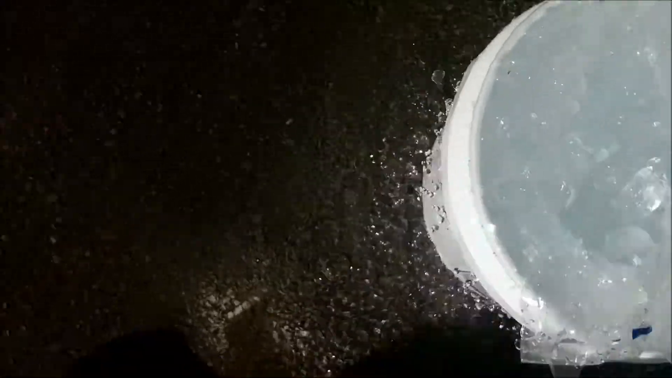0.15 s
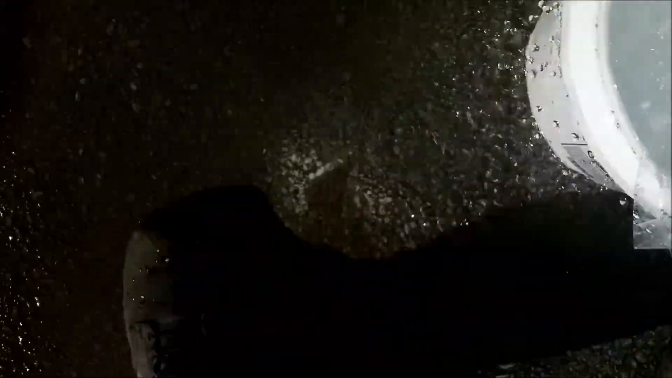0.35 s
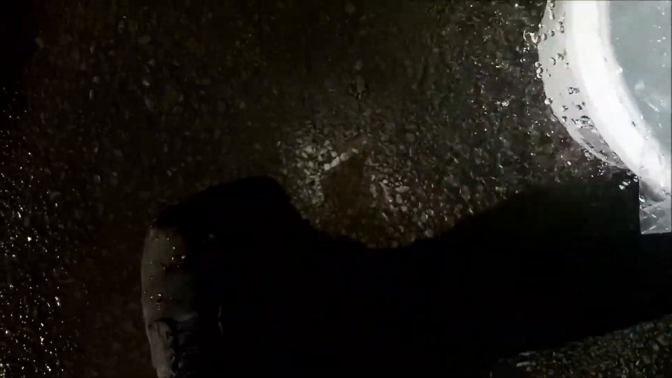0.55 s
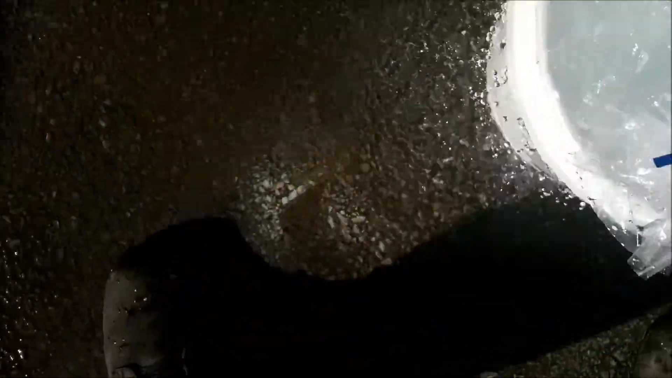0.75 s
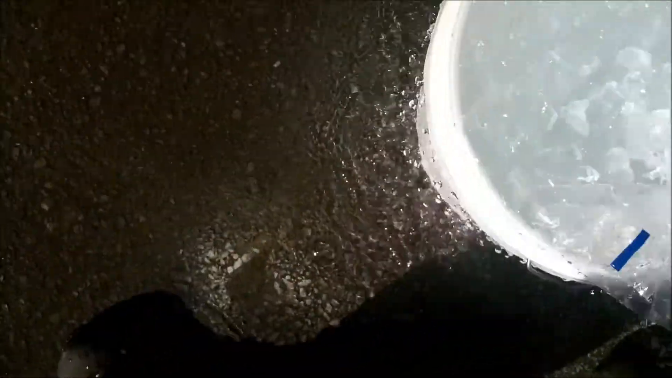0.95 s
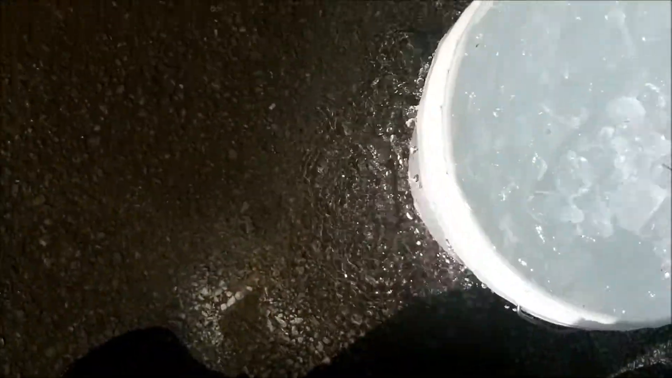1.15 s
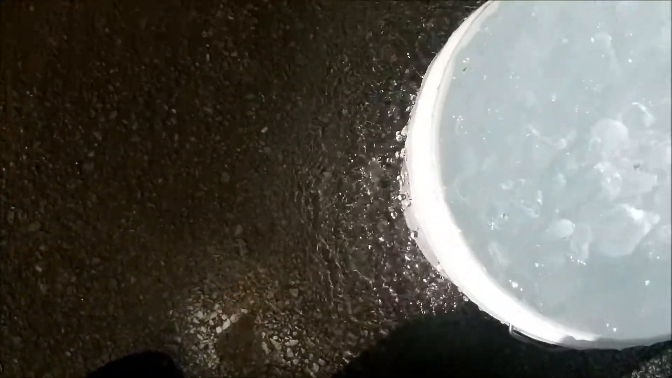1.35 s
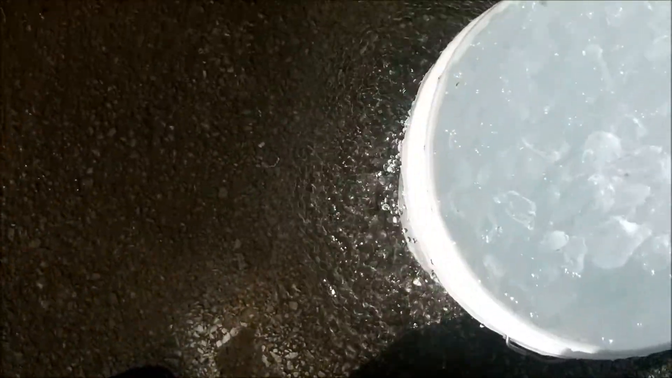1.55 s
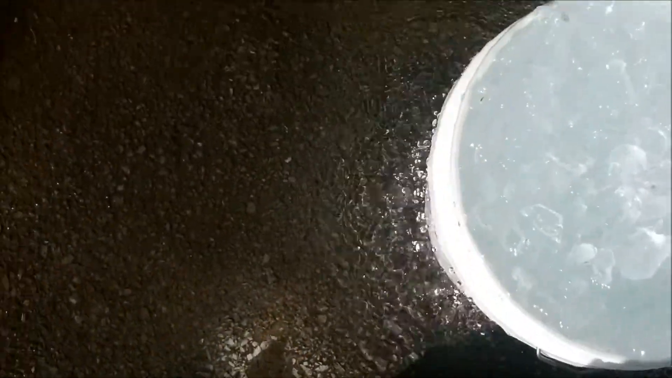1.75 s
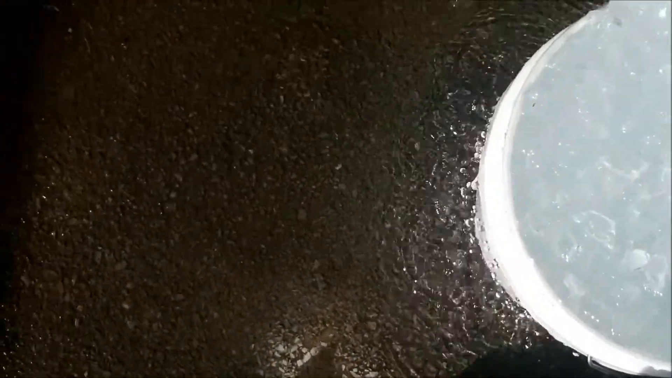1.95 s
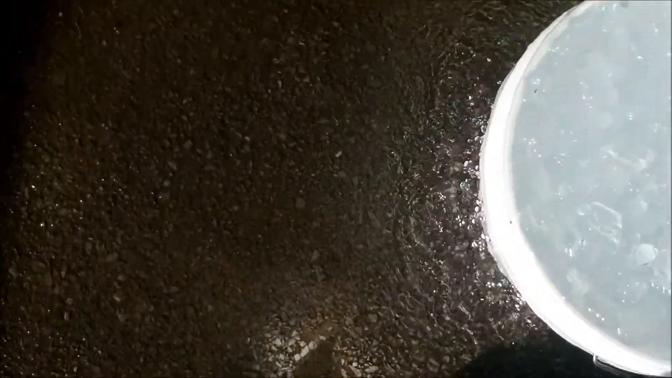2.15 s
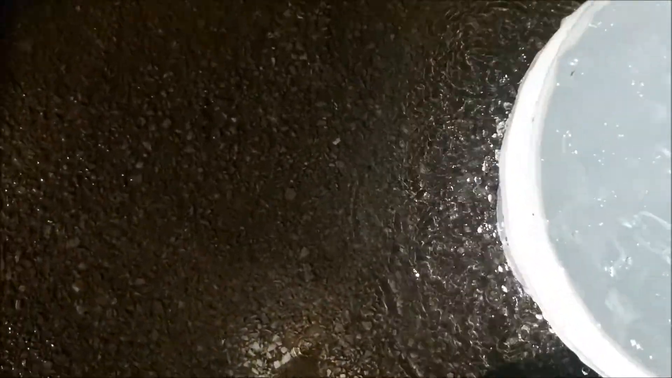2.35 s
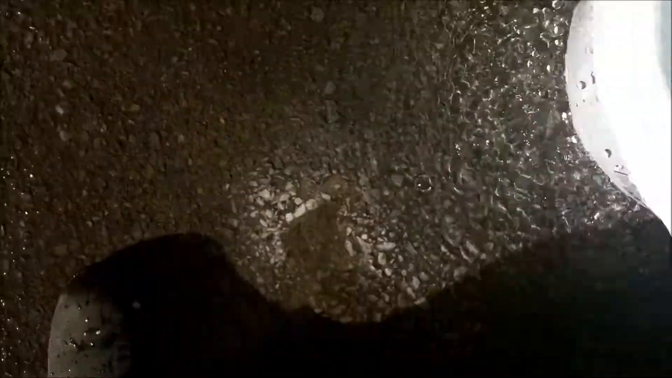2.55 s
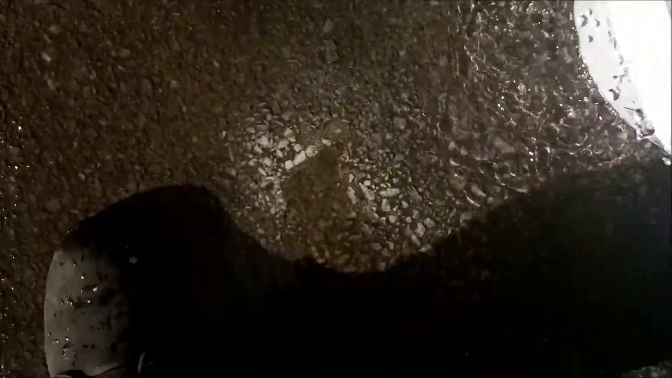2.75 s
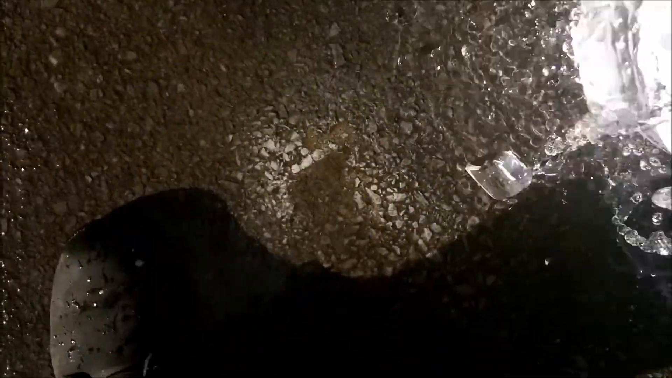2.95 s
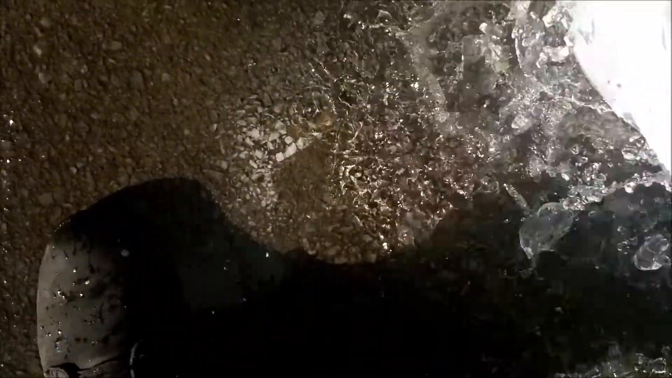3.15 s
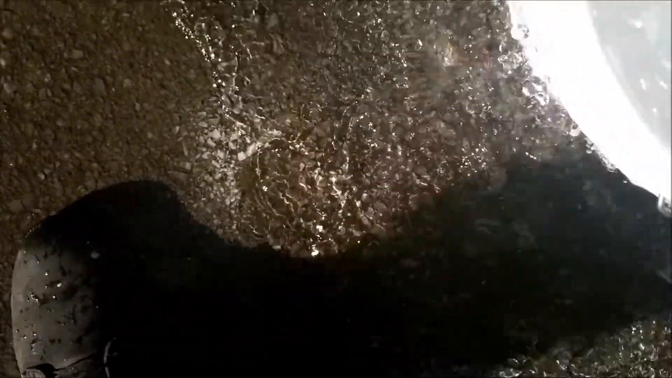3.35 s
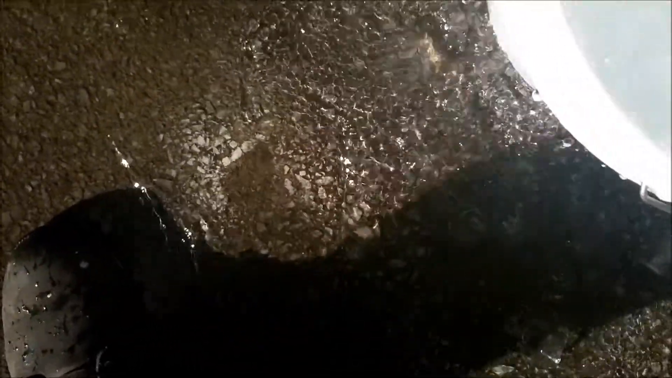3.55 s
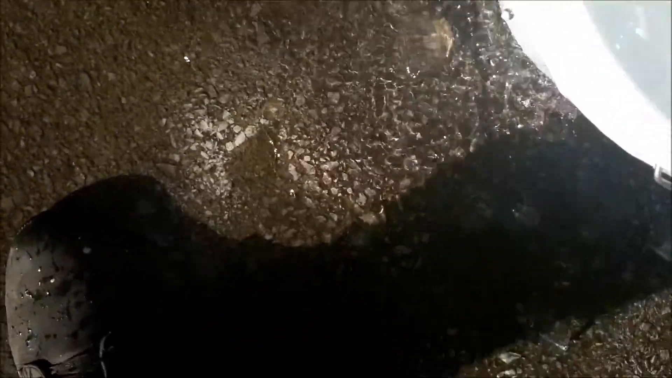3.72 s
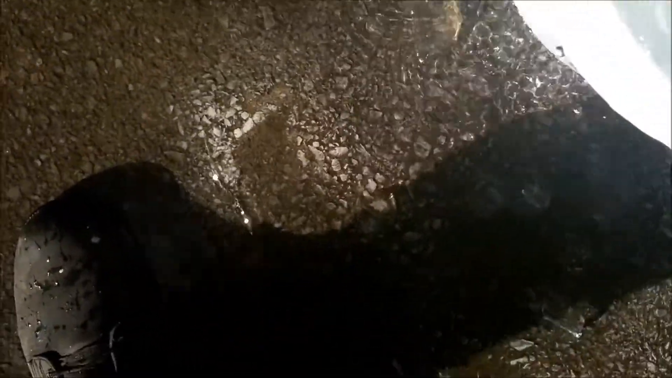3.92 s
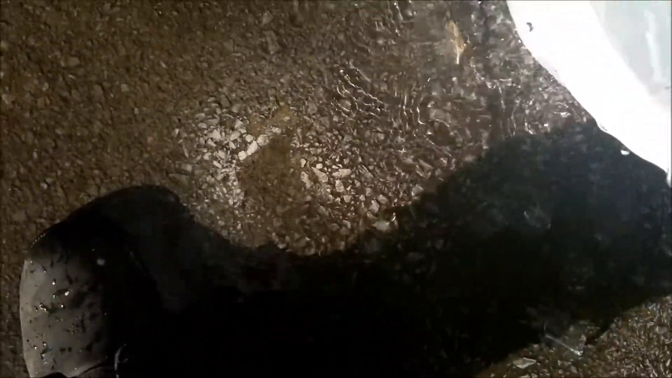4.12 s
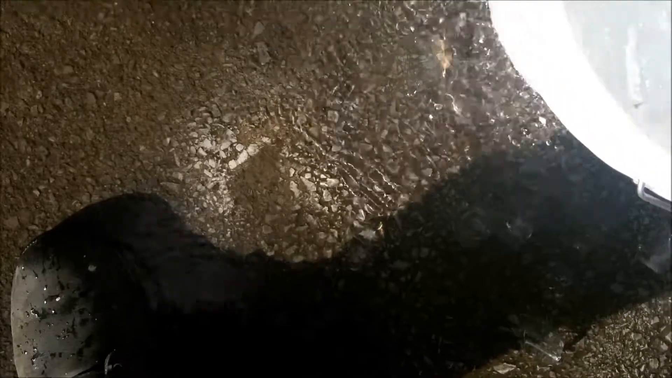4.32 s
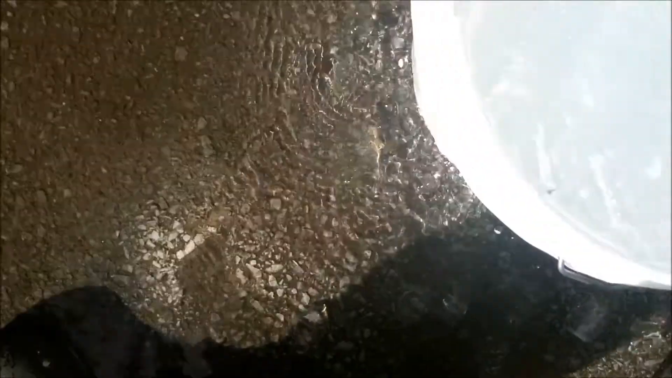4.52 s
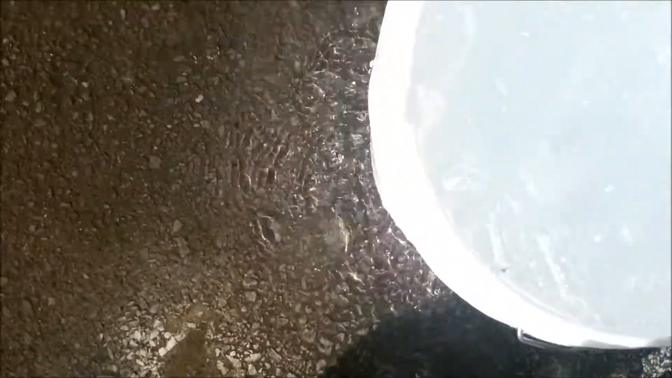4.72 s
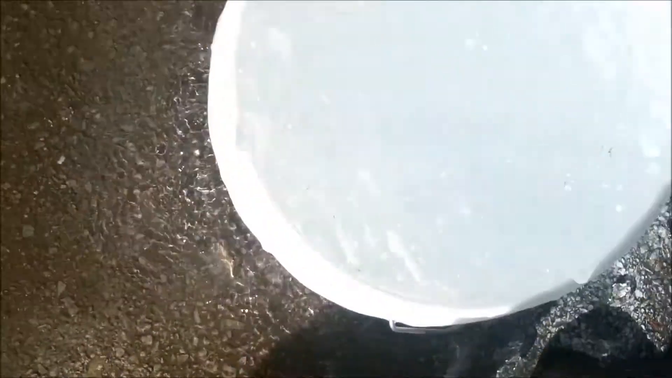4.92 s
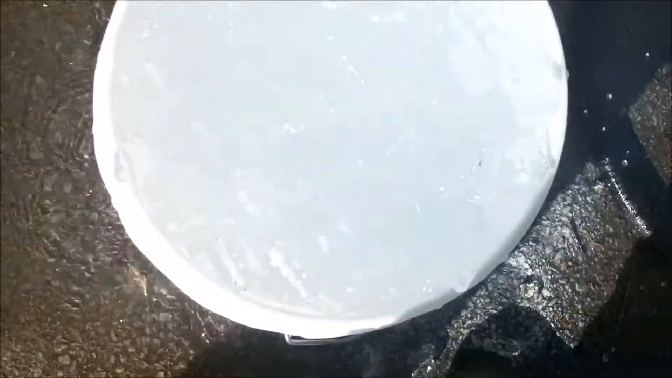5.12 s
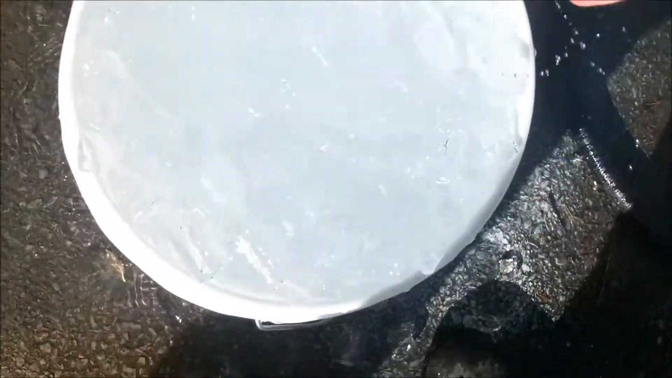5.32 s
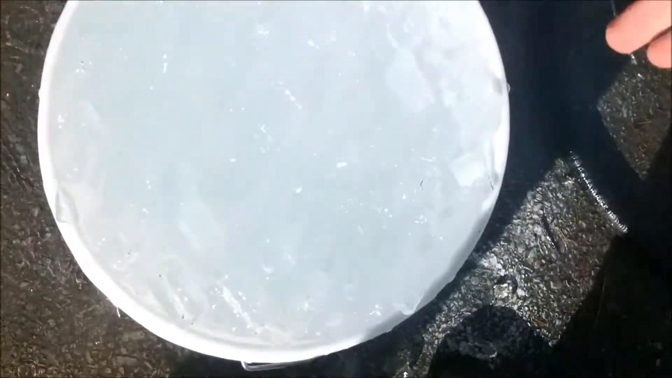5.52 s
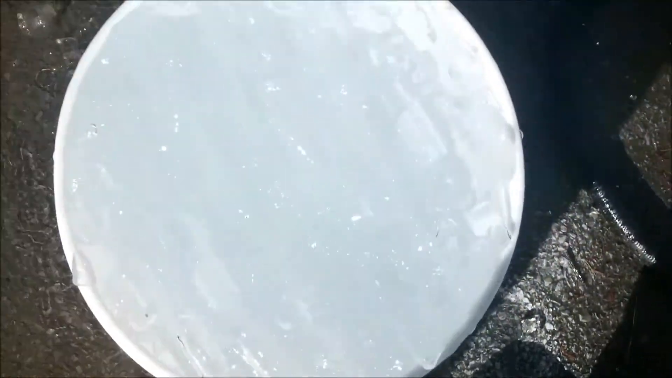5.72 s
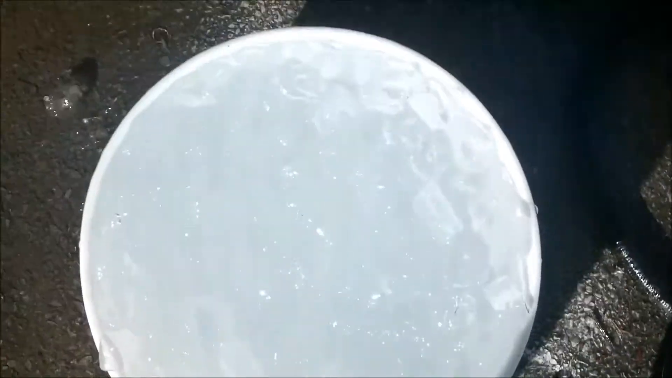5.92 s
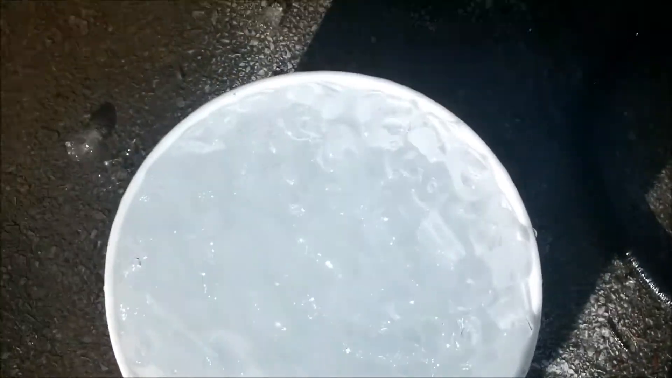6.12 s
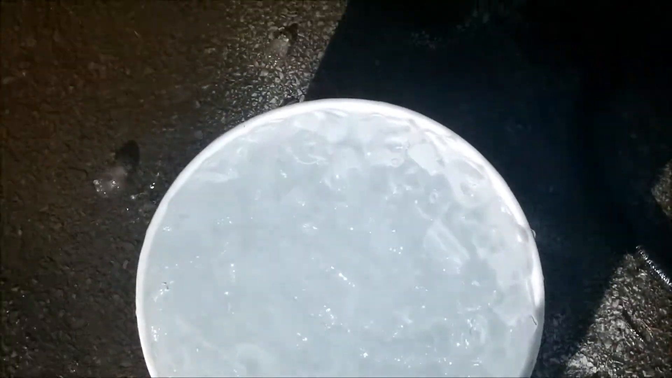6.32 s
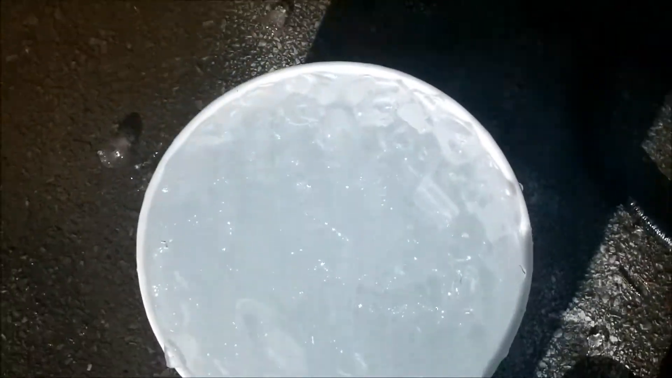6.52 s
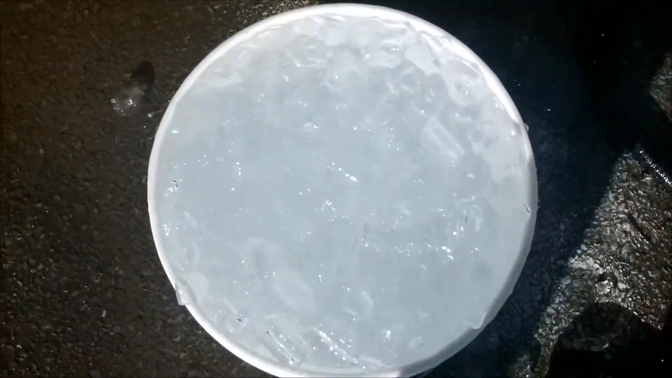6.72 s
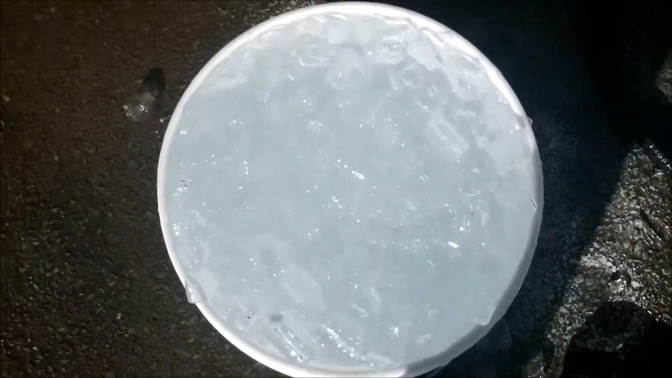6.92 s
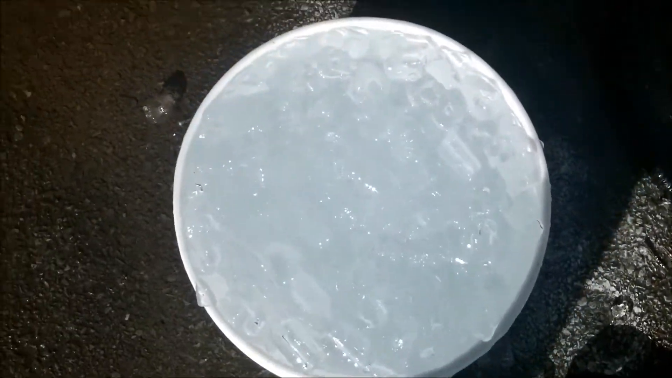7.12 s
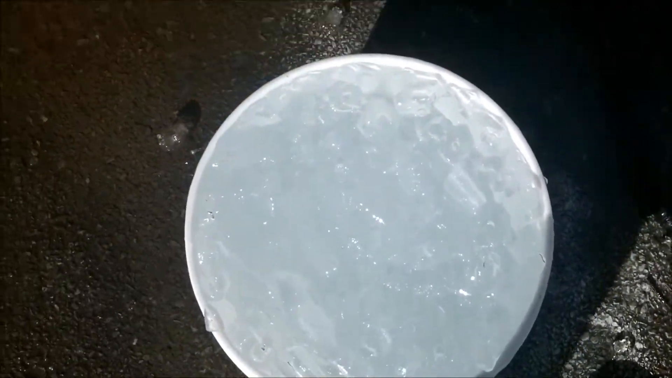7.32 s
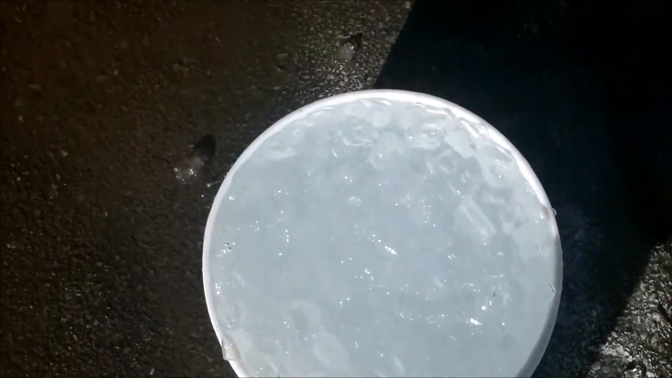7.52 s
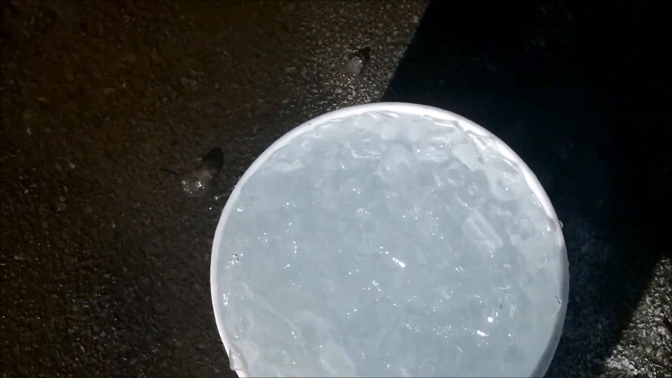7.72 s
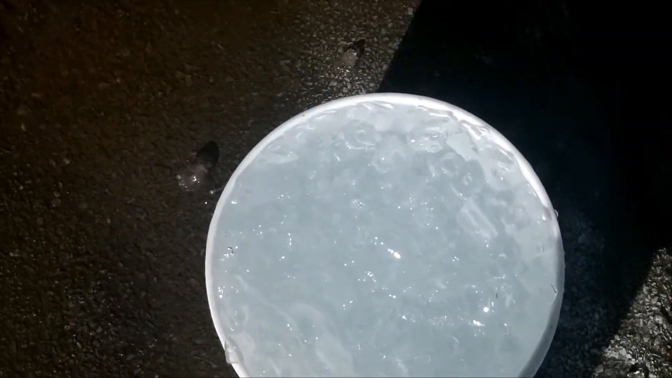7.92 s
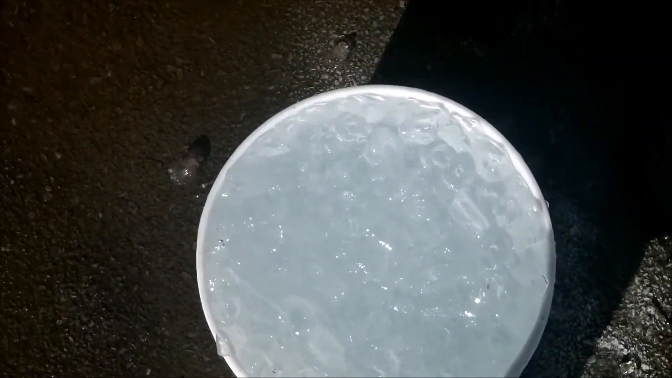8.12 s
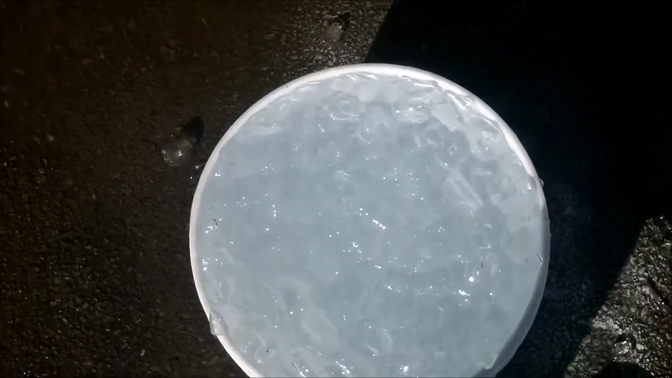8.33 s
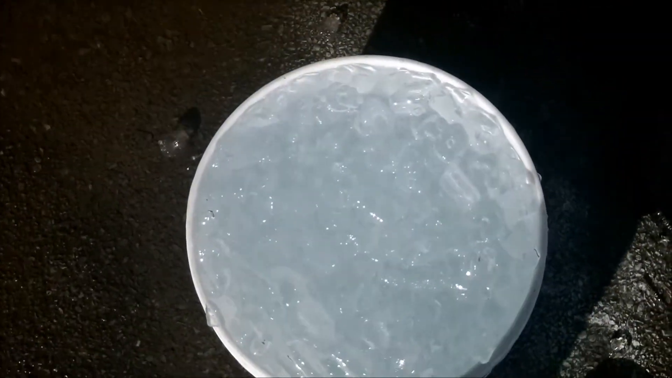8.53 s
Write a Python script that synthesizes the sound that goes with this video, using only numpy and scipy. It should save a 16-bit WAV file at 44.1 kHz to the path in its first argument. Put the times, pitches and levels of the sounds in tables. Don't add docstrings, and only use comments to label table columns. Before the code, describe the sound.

Close by, outdoors, the pour is already under way at 0 s: a dense bright rush of tiny ringing bubbles, pulsing several times a second, with ice knocks, dry ticks and plastic bag snaps. Around 1.7 s it thins to separate plops and drops. At 2.7 s water slaps wet gravel and a loud splashing flood begins, full of hard clacks and rising bubble plops, strongest around 3.1 to 3.7 s. After a short dip near 3.9 s, a second flood surges from 4 to 4.7 s, with short upward bloops, then dies by 5.1 s. What remains is quiet open air, soft low wind with a gust near 6.9 s, and a distant motor's faint wavering hum and whine. Sparse drips come between 5.7 and 6.1 s; drips and tiny crinkles cluster from 6.9 to 7.4 s. A very faint, falling wet sole creak follows at 7.5 s, then calm air until 8.5 s.

```python
import sys
import numpy as np
from scipy import signal
from scipy.io import wavfile
from scipy.ndimage import uniform_filter1d

SR = 44100
rng = np.random.default_rng(int(sys.argv[2]) if len(sys.argv) > 2 else 0)


def undo_db(level):
    steps = np.asarray(level, float) / 20
    return 10 ** steps


def generate_wav(signal):
    frames = np.transpose(np.atleast_2d(signal))
    scaled = np.clip(frames, -1, 1) * 32767
    pcm = np.round(scaled).astype(np.int16)
    wavfile.write(sys.argv[1], SR, pcm)


N = 377937

# (f/Hz, density/dB per Hz)
RUSH_COLOUR = [(210, -23), (350, -33), (512, -16.5), (774, -7.5), (2500, 3.5), (3700, -7.5), (5440, -18),
               (6280, -24.5), (7590, -35.5), (11300, -33.5), (15500, -62)]


def evened(x):
    return x / np.sqrt(np.mean(x ** 2) + 1e-20)


def smoothed(x, size):
    return uniform_filter1d(uniform_filter1d(x, size), size)


def curve(rows):
    s, *columns = np.transpose(rows)
    return [np.interp(np.arange(N) / SR, s, c) for c in columns]


def colour(x, points):
    f, db = np.transpose(points)
    hz = np.abs(np.fft.fftfreq(8192, 1 / SR))
    log_gain = np.log(undo_db(np.interp(np.log(hz + 1), np.log(f + 1), db)))
    spectrum = np.exp(log_gain - 1j * signal.hilbert(log_gain).imag)
    taps = np.fft.ifft(spectrum).real[:4096]
    return signal.oaconvolve(x, taps)[:len(x)]


def band(x, lo_hz, hi_hz):
    edges_hz = [lo_hz, min(hi_hz, .45 * SR)]
    return signal.sosfilt(signal.butter(2, edges_hz, "bandpass", fs=SR, output="sos"), x)


def resonate(x, hz, width_hz):
    r = np.exp(-np.pi * width_hz / SR)
    return signal.lfilter([1 - r], [1, -2 * r * np.cos(2 * np.pi * hz / SR), r * r], x)


def add(mix, s, sound):
    part = mix[round(s * SR):][:len(sound)]
    part += sound[:len(part)]


def surges(rows):
    roundness = 1.23
    t = np.arange(0, N / SR + .01, .002)
    s, db, rise, fall = np.transpose(rows)[:, :, None]
    away = np.where(t < s, (s - t) / rise, (t - s) / fall)
    power = undo_db(2 * (db - 10 * away ** roundness)).sum(0)
    return np.interp(np.arange(N) / SR, t, 10 * np.log10(power + 1e-12))


def bubble(hz, t60, rise, start=0.00035):
    t = np.arange(round(t60 * SR) + 8) / SR
    shape = undo_db(-60 * t / t60) * (1 - np.exp(-(t / start) ** 2))
    return np.sin(2 * np.pi * hz * (t + rise * t ** 2 / (2 * t60))) * shape / shape.max()


def grains(lo_hz, hi_hz, per_s, cycles, spread_db, bunch, count=14):
    out = np.zeros(N)
    for hz in np.geomspace(lo_hz, hi_hz, count):
        chance, size, stretch = rng.random(N), rng.exponential(1, N), rng.uniform(0.21, 7.32)
        hits = undo_db(spread_db * np.minimum(size, 4)) * (chance < per_s * bunch / count / SR)
        grain = bubble(hz, stretch * cycles / hz, 1.0)
        out += signal.oaconvolve(hits, grain / np.linalg.norm(grain) * np.sqrt(hz))[:N]
    return out


def air():
    # (f/Hz, density/dB per Hz)
    air_colour = [(29, -35), (50, -36), (85, -3), (197, -5), (352, -2.5), (674, -6), (837, -2.5),
                  (1260, -5), (1530, -2.5), (5750, -16.5), (8050, -28.5), (9760, -22), (14700, -20.5),
                  (15800, -36)]
    # (t/s, level/dB)
    air_swell = [
        (0, 5),
        (2.3, 4),
        (2.7, 9),
        (3.1, 3),
        (6.4, 3),
        (7.6, 2.5),
        (8.4, 4.5),
    ]
    frames, hz = N // 512 + 5, np.fft.rfftfreq(2048, 1 / SR)
    a, b, patches = rng.standard_normal((frames, 1025, 3)).T
    patches = evened(uniform_filter1d(uniform_filter1d(patches, 20, 0), 8, 1))
    f, db = np.transpose(air_colour)
    swell_db = np.interp(np.arange(frames) * 512 / SR, *np.transpose(air_swell))
    colour_db = np.interp(np.log(hz + 1), np.log(f + 1), db)[:, None]
    field_db = colour_db + (1.62 * patches + swell_db) / (1 + (hz[:, None] / 4500) ** 4)
    noise = signal.istft((a + 1j * b) * undo_db(field_db), nperseg=2048, noverlap=1536)[1][:N]
    return undo_db(-37.5 - 1.31) * evened(noise)


def machine():
    # (t/s, level/dB)
    hum_level = [(0, -63.5), (4.15, -54), (4.96, -62), (5.16, -49.5), (6.35, -55.5), (6.78, -44),
                 (7.35, -47.5), (7.59, -63), (7.99, -44.5), (8.14, -50), (8.26, -69), (8.45, -55)]
    # (f/Hz, level/dB)
    whines = [(346, -52), (463.0, -57), (1502, -52), (1906, -66), (3770, -61)]
    hum_hz = 76
    wander = evened(uniform_filter1d(rng.standard_normal(N), 15000))
    hum = np.sqrt(2) * np.sin(2 * np.pi * np.cumsum(hum_hz + 0.68 * wander) / SR)
    out = undo_db(curve(hum_level)[0]) * hum
    gain_db = .5 * (np.arange(N) / SR - 5.0)
    for hz, db in whines:
        tone = np.sqrt(2) * np.sin(2 * np.pi * np.cumsum(hz * (1 + .006 * wander)) / SR)
        fuzz = evened(resonate(rng.standard_normal(N), hz, .02 * hz))
        out += undo_db(db + gain_db) * (.7 * tone + .45 * fuzz)
    return out


def wind():
    # (t/s at peak, level/dB, rise/s, fall/s)
    gusts = [
        (2.75, -48.5, 0.35, 0.37),
        (6.85, -44, 0.15, 0.65),
    ]
    breeze_db = -55
    level = np.sqrt(undo_db(2 * surges(gusts)) + undo_db(2 * breeze_db))
    return undo_db(2.5) * level * evened(band(rng.standard_normal(N), 7.6, 68))


def rush():
    # (t/s at peak, level/dB, rise/s, fall/s)
    pour = [(.018, -24.5, 0.037, 0.094), (.144, -18.5, 0.071, 0.072), (.24, -26, 0.047, 0.049),
            (.342, -17, 0.12, 0.094), (.5, -22, 0.15, 0.089), (.636, -20.5, 0.023, 0.069),
            (.718, -18.5, 0.031, 0.073), (.8, -20, 0.069, 0.061), (.865, -38, .02, 0.027),
            (.994, -16.5, 0.17, 0.058), (1.05, -26, 0.022, .09), (1.168, -18, 0.054, 0.021),
            (1.2, -21.5, .03, 0.06), (1.305, -17, 0.04, 0.059), (1.425, -21, 0.031, 0.036),
            (1.46, -24.5, 0.04, 0.13), (1.54, -22.5, 0.026, 0.034), (1.639, -23, 0.033, 0.12),
            (1.935, -26.5, 0.014, 0.026), (2.145, -30.5, 0.17, 0.16), (2.271, -26, 0.02, 0.017),
            (2.346, -30.5, 0.032, 0.0084), (2.505, -27.5, 0.12, 0.049), (2.614, -21, 0.038, 0.043),
            (2.709, -17, 0.039, 0.049), (2.825, -16, 0.012, 0.94), (3.13, -25.5, 0.45, 0.19),
            (3.332, -17.5, 0.045, 0.11), (3.463, -17, 0.017, 0.11), (3.56, -22, .05, 0.035),
            (3.66, -18.5, 0.076, 0.13), (3.73, -21.5, 0.076, 0.24), (3.99, -16, 0.034, 0.073),
            (4.04, -15.5, 0.051, 0.052), (4.135, -16.5, 0.038, 0.042), (4.175, -25, 0.023, 0.028),
            (4.27, -16, 0.19, 0.13), (4.44, -23, 0.052, 0.011), (4.51, -15, 0.11, 0.072),
            (4.59, -20, 0.055, 0.082), (4.686, -18, 0.073, 0.048), (4.76, -25.5, .03, 0.087),
            (4.85, -29, 0.14, 0.13), (5.097, -35, 0.19, 0.043)]
    # (t/s, share)
    flooding = [
        (0, -0.14),
        (1.5, -0.68),
        (2.75, -0.14),
        (2.87, 1.02),
        (3.4, 0.36),
        (3.9, -0.46),
        (4.0, 0.73),
        (4.6, 0.95),
        (5.3, 0.2),
    ]
    usual_db = -24
    level_db, spill = surges(pour), curve(flooding)[0]
    lull_db = np.minimum(usual_db - level_db, 25)
    spray_db = -6.5 - 6.5 * spill
    gurgle_db = -12.5 - 3 * spill + 0.054 * lull_db
    wall_db = -25.5 + 21.5 * spill

    lumps = evened(smoothed(rng.standard_normal(N), 200))
    shakes = evened(smoothed(rng.standard_normal(N), 1100))
    even = 1 - 0.4 * np.clip(spill, 0, 1) ** 2
    thin = undo_db(-.6 * np.maximum(lull_db + 4, 0))
    bunch = thin * undo_db((2.2 * lumps + 1.0 * shakes) * even)

    gurgle = evened(colour(grains(432, 891, 1200, 5.27, 4.9, bunch), RUSH_COLOUR))
    splash = evened(colour(grains(1100, 4100, 3000, 8.5, 3.2 * even, bunch), RUSH_COLOUR))
    spray = evened(colour(grains(3530, 6380, 2500, 4.2, 3.3, bunch), RUSH_COLOUR))
    sizes = undo_db(4.0 * even * np.minimum(rng.exponential(1, N), 4))
    crackle = sizes * (rng.random(N) < 450 * bunch / SR)
    crackle = colour(crackle * rng.choice([-1, 1], N), RUSH_COLOUR)
    low, high = evened(band(crackle, 1350, 4870)), evened(band(crackle, 4230, 17000))
    wall = evened(resonate(splash + 0.11 * low, 2230, 330))

    mix = splash + 0.54 * low
    mix += undo_db(spray_db) * (1.0 * spray + 0.51 * high)
    mix += undo_db(gurgle_db) * gurgle + undo_db(wall_db) * wall
    return undo_db(level_db - 5.5) * mix / np.sqrt(thin)


def plops():
    # (t/s, peak level/dB, f/Hz, t60/s)
    strong_plops = [(0.1016, -10, 2040, 0.029), (0.131, -6.5, 2660, 0.026), (0.3035, 1, 2440, 0.0034),
                    (0.3834, -5, 2700, 0.0046), (0.462, 0, 2580, 0.0021), (0.4792, -11, 2260, 0.015),
                    (0.534, -15, 2410, 0.0054), (0.5406, -7, 2740, 0.0048), (0.5537, -11.5, 1970, 0.029),
                    (0.5606, -17, 2060, 0.0055), (0.6398, -9, 2470, 0.011), (0.6728, -21, 2470, 0.012),
                    (0.7197, 1, 1710, 0.0061), (0.7787, -0.5, 2510, 0.0076), (0.9473, -6, 2500, 0.0094),
                    (1.0904, -20, 2000, 0.0059), (1.1519, 1.5, 3200, 0.0027), (1.2025, -6, 2570, 0.0038),
                    (1.4482, -0.5, 2400, 0.0046), (1.4564, -3, 2900, 0.0072), (1.522, -4, 2720, 0.0069),
                    (1.5413, -10, 2140, 0.019), (1.5749, -14, 3030, 0.0064), (1.621, -8, 3230, 0.011),
                    (1.6357, -0.5, 2680, 0.0077), (1.7138, -10, 2570, 0.01), (1.7713, -9, 3240, 0.0061),
                    (1.925, -11.5, 1470, 0.021), (1.9332, -4.5, 2350, 0.012), (1.938, -2, 1550, 0.018),
                (1.9626, -15, 2320, 0.0087), (2.0392, -16.5, 2790, 0.049), (2.131, -12, 2320, 0.014),
                (2.1383, 0, 3030, 0.0059), (2.434, -9, 1610, 0.0053), (2.5394, -8.5, 1710, 0.033),
                (2.8016, 1, 3120, 0.0026), (2.8305, -4.5, 2050, 0.016), (3.0828, -2, 2430, 0.011),
                (3.1264, -2, 2310, 0.017), (3.1398, -2, 1750, 0.006), (3.1701, 3, 2150, 0.017),
                (3.225, 2, 2230, 0.017), (3.2583, 0, 2124, 0.026), (3.301, -6, 1730, 0.027),
                (3.3453, -4.5, 1680, 0.017), (3.4184, 2, 2170, 0.015), (3.461, -1, 1510, 0.0047),
                (3.4993, -11, 2400, 0.007), (3.532, -3.5, 2200, 0.015), (3.698, -7, 3100, 0.038),
                (3.7188, -3, 2210, 0.0031), (3.9919, -3, 2150, 0.014), (4.402, -14, 2240, 0.017),
                (4.4624, -13, 2140, 0.013), (4.4682, -8, 1730, 0.029), (5.089, -12.5, 2080, 0.016)]
    # (t/s, peak level/dB, f/Hz)
    droplets = [(1.7833, -16.5, 1840), (1.8312, -21, 2000), (1.9754, -20, 2000), (2.0832, -17.5, 2900),
                (2.2656, -20, 2760), (2.337, -21, 2610), (2.4086, -35, 2360), (2.5034, -18, 2620),
                (2.631, -9, 1930), (4.797, -20, 2140), (4.8196, -17, 2700), (4.8666, -17, 2160),
                (4.9774, -23, 910), (5.029, -18, 1970)]
    # (t/s, peak level/dB, f/Hz)
    taps = [(0.0144, -13, 2680), (0.0682, -17, 2240), (0.2089, -21, 2430), (0.4172, -13, 1660),
            (0.4444, -11, 2300), (0.5834, -25, 1910), (0.611, -15, 2700), (0.628, -12, 2500),
            (0.8589, -11, 2170), (1.0273, -12, 2370), (1.2336, -20, 1980), (1.2654, -16, 2770),
            (1.2915, -16, 2130), (1.3834, -15, 2440), (1.3907, -13, 2150), (1.4097, -19, 1570),
            (1.4214, -12, 2470), (1.4795, -14, 2780), (1.498, -14, 2660), (1.5998, -18, 1960),
            (2.5795, -17, 1900), (2.5975, -17, 2100), (2.7013, -9, 2420), (2.8374, -3, 2220),
            (2.9672, -7, 2020), (3.1914, -5, 1670), (3.2764, -19, 2290), (3.3266, -3, 2340),
            (3.4025, -11.5, 2250), (3.4485, -4, 2310), (3.5483, -10, 2240), (3.5687, -12, 2240),
            (3.6007, -7, 2760), (3.682, -14, 3090), (3.827, -7, 2650), (3.8714, -14, 2120),
            (3.97, -18, 1760), (3.9804, -8, 2180), (4.0986, -11, 1590), (4.1205, -7, 2200),
            (4.1776, -17, 1470), (4.3505, -7, 2390), (4.4313, -19, 2200), (4.4383, -15, 2170),
            (4.488, -13, 1840), (4.5234, -9, 1820), (4.5976, -7, 1960), (4.6174, -9, 1770),
            (4.6643, -7, 2080), (4.885, -14, 2110), (5.057, -23, 2040)]
    # (t/s, peak level/dB, start f/Hz, climb/share of f, t60/s)
    bloops = [(1.999, -31, 2000, 0.71, 0.045), (2.1525, -19.5, 1046, 3.2, 0.089),
              (4.5, -13, 1003, 2.8, 0.055), (4.575, -13.5, 1330, 1.9, 0.093),
              (4.687, -14, 2070, 1.8, 0.048), (3.357, -9, 1330, 0.96, 0.025), (2.97, -21, 820, 0.66, 0.017),
              (3.011, -19, 940, 0.56, 0.03), (3.156, -16.5, 1000, .5, 0.015), (3.449, -30, 1030, .5, .02),
              (3.469, -15, 1300, 0.64, 0.02), (3.523, -18, 840, 1.03, 0.019),
              (3.733, -16.5, 980, 1.1, 0.035), (5.095, -26.5, 2400, 1.03, .022),
              (4.705, -19.5, 3430, 0.24, 0.016), (4.6, -11.5, 1750, 0.29, 0.069)]
    droplet_t60, tap_t60 = 0.021, 0.015
    rows = strong_plops
    rows += [(*drop, droplet_t60) for drop in droplets]
    rows += [(*tap, tap_t60) for tap in taps]
    out, luck = np.zeros(N), rng.random((len(rows), 2))
    for (s, db, hz, t60), (a, b) in zip(rows, luck):
        t60 = max(t60, .003)
        add(out, s, undo_db(db - 3.5) * bubble(hz, t60, 0.025 + 0.37 * a))
        add(out, s, undo_db(db - 14.0) * bubble(hz * (0.574 + 0.236 * b), 1.55 * t60, 0.45))
    for s, db, hz, climb, t60 in bloops:
        add(out, s, undo_db(db) * bubble(hz, t60, climb, 0.0024))
    return out


def clacks():
    # (t/s, peak level/dB, f/Hz, edge above 9 kHz/dB re peak)
    snaps_and_clacks = [(0.151, -16, 3420, -42), (0.3034, -5.5, 3200, -23), (0.476, -10.5, 5500, -36),
                        (0.561, -14.5, 3910, -35), (0.6355, -32, 3900, -39), (0.779, -19, 3640, -17),
                        (0.7975, -18, 3720, -38), (0.877, -17, 5270, -25), (1.312, -16, 5300, -35),
                        (1.4156, -14, 4500, -39), (1.437, -12.5, 4700, -26), (1.4566, -2, 3620, -20.5),
                        (1.522, -5.5, 3740, -29), (1.546, -8.5, 4770, -34), (1.5751, 3, 3770, -23),
                        (1.622, -9, 4700, -45), (1.653, -11, 5100, -22.5), (1.6926, -12.5, 3620, -41),
                        (1.7156, -14.5, 5270, -29), (1.7426, -20, 3930, -23),
                        (1.939, -11.5, 3220, -28), (1.9964, -13.5, 5900, -26), (2.1758, -16.5, 5060, -30),
                  (2.186, -25.5, 4330, -16), (2.3214, -25, 5800, -26), (2.493, -16, 5000, -26),
                  (2.5112, -17, 3880, -34), (2.54, -17.5, 3600, -36), (2.7982, -12, 4350, -53),
                  (2.8153, -5, 5470, -22.5), (2.8322, -10.5, 4820, -39), (3.142, -6, 4100, -37),
                  (3.156, -15, 3310, -21), (3.217, -12.5, 4330, -23), (3.329, -9, 3930, -28),
                  (3.435, -13, 4860, -24), (3.46, -6, 3300, -24), (3.473, -14, 4230, -24),
                  (3.527, -10.5, 3230, -25), (3.7191, -6.5, 3500, -33), (3.7921, -6, 4100, -23),
                  (4.2365, -10.5, 3430, -30), (4.259, -12, 3920, -33), (4.5135, -14.5, 5800, -19),
                  (4.5715, -18, 3280, -36)]
    rows = snaps_and_clacks
    body, edges, t = np.zeros(N), np.zeros(N), np.arange(400) / SR
    noise = rng.standard_normal((len(rows), 2, 400))
    for (s, db, hz, edge_db), (crack, edge) in zip(rows, noise):
        crack_fade = undo_db(db - 8.5 - 60 * t / 0.019)
        edge_shape = undo_db(db + edge_db - 60 * abs(t - .0045) / 0.0041)
        add(body, s, undo_db(db + 6.5) * bubble(hz, 0.002, 0.048, 0.00013))
        add(body, s, crack_fade * evened(band(crack, 1700, 5700)))
        add(edges, s - .004, edge_shape * evened(band(edge, 9800, 14500)))
    return body, edges


def ticks():
    # (t/s, peak level/dB)
    ice_ticks = [(0.1604, 1), (0.302, -2), (0.391, -10), (0.8739, -12), (0.9735, -1), (1.0054, -6),
                 (1.0266, -12), (1.1523, -11), (1.2915, 1), (1.3384, -10), (1.3506, -3), (2.832, 1),
                 (3.1554, 1), (3.3443, 4), (3.4597, 6), (3.4993, -4), (3.7189, 9), (4.0504, -5),
                 (4.1384, -4), (4.1816, -5), (4.203, -7), (4.212, -5), (4.2597, -1), (4.2654, 4),
                 (4.2788, 0), (4.3505, -12), (4.3792, -4), (4.4844, -9), (4.514, -8), (4.7518, -6),
                 (4.7722, -6), (7.1389, -26)]
    click = colour(np.eye(1, 300)[0], RUSH_COLOUR)
    out = np.zeros(N)
    for s, db in ice_ticks:
        add(out, s, undo_db(db - 6.5) * click / abs(click).max())
    return out


def drips():
    # (t/s, peak level/dB, f/Hz, scatter length/s)
    lone_drips = [(1.885, -16, 5730, 0.0024), (5.109, -22, 4050, 0.0021), (5.161, -27, 4130, 0.0027),
                  (5.732, -22.5, 2230, 0.0033), (5.897, -28, 2600, 0.0066), (6.06, -19.5, 2260, 0.0022),
                  (6.862, -21, 4740, 0.0031), (6.866, -19.5, 2100, 0.0051), (7.013, -27, 1930, 0.0033),
                  (7.016, -22, 2600, 0.0098), (7.041, -25.5, 3000, 0.012), (7.136, -15.5, 3480, 0.0023),
                  (7.212, -26, 4640, .002), (7.217, -20, 1780, 0.012), (7.251, -26, 3400, 0.0033),
                  (7.38, -26, 3350, 0.018), (7.3945, -16.5, 3400, 0.0022), (7.395, -14.5, 2170, 0.0022),
                  (7.4155, -23, 2520, 0.016), (7.418, -21.5, 3670, 0.019), (7.439, -26.5, 3580, 0.034),
                  (7.133, -28.5, 3620, 0.044)]
    body, edges, t = np.zeros(N), np.zeros(N), np.arange(2500) / SR
    noise = rng.standard_normal((len(lone_drips), 2500))
    for (s, db, hz, length), scatter in zip(lone_drips, noise):
        fade = undo_db(db) * np.exp(-t / max(length, .001))
        add(body, s, undo_db(db - 3.0) * bubble(hz, 0.0071, 0.11, 0.00024))
        add(body, s, undo_db(-10.5) * fade * evened(band(scatter, 0.53 * hz, 1.17 * hz)))
        add(edges, s, undo_db(-28.0) * fade * evened(band(scatter, 4100, 11500)))
    return body, edges


def slaps():
    # (t/s, level/dB, length/s)
    ground_slaps = [
        (2.699, -20.5, 0.0088),
    ]
    out, t = np.zeros(N), np.arange(3000) / SR
    for s, db, length in ground_slaps:
        swell = t / length * np.exp(1 - t / length)
        add(out, s, undo_db(db) * swell * evened(band(rng.standard_normal(3000), 210, 1600)))
    return out


def squeak():
    # start t/s, end t/s, start f/Hz, end f/Hz, level/dB
    start, end, start_hz, end_hz, db = (7.45, 7.78, 3480, 3200, -55.5)
    out, size = np.zeros(N), round((end - start) * SR)
    rough = evened(uniform_filter1d(rng.standard_normal(size), 300))
    tone = np.sin(2 * np.pi * np.cumsum(np.linspace(start_hz, end_hz, size) + 25 * rough) / SR)
    add(out, start, undo_db(db + 3.0 * rough) * np.sqrt(2) * tone * signal.windows.tukey(size, .5))
    return out


def yard(x):
    t = np.arange(0, 3000, 20) + rng.integers(0, 20, 150)
    taps = np.zeros(3100)
    taps[t + 40] = rng.choice([-1., 1.], 150) * undo_db(-60 * t / SR / 0.098)
    return signal.oaconvolve(x, taps / np.linalg.norm(taps))[:N]


def ducking(x):
    threshold_db, share, recovery_db_per_s = -17.5, 0.29, 251
    lookahead = 220
    power_db = 10 * np.log10(abs(uniform_filter1d(x ** 2, size=130)) + 1e-12)
    fall = np.arange(N) * recovery_db_per_s / SR
    held_db = np.maximum.accumulate(power_db + fall) - fall
    over_db = np.maximum(held_db - threshold_db, 0)
    over_db = np.maximum(over_db, np.roll(over_db, -lookahead))
    return undo_db(-share * uniform_filter1d(over_db, size=130))


def gate(x):
    # (f/Hz, level/dB re the local level)
    gate_threshold = [(6000, -20), (7000, -.8), (8500, -.4), (10500, -1.0), (15000, -.9)]
    hz, _, z = signal.stft(x, SR, nperseg=2048, noverlap=1024, window="cosine")
    power = abs(z) ** 2
    local = uniform_filter1d(uniform_filter1d(power, size=64, axis=1), size=2, axis=2)
    threshold = undo_db(2 * np.interp(hz, *np.transpose(gate_threshold)))[:, None] * local
    near = uniform_filter1d(uniform_filter1d(power, size=5, axis=1), size=2, axis=2)
    treble = power[:, hz > 9000].sum(1, keepdims=True)
    crack = treble > 4 * np.median(treble)
    keep = (near > threshold) & (hz < 15450)[:, None]
    keep = keep | (crack & (hz < 15900)[:, None])
    return signal.istft(z * keep, SR, nperseg=2048, noverlap=1024, window="cosine")[1][:, :N]


def scene():
    hits, edges = np.add(clacks(), drips())
    hits = hits + plops() + ticks()
    hits = hits + undo_db(-15) * yard(hits)
    hits = 1.4 * np.tanh(hits / 1.4)
    hits = signal.sosfilt(signal.butter(6, 6400, fs=SR, output="sos"), hits)
    background = air() + machine() + wind()
    mix = background + rush() * ducking(hits) + hits + edges + slaps() + squeak()
    return mix[None]


def roll_off(x):
    return signal.sosfilt(signal.butter(12, 15960, fs=SR, output="sos"), x)


def record(dry):
    clipped = np.clip(dry, -1, 1)
    return roll_off(gate(clipped))


dry = scene()
out = record(dry)
generate_wav(out)
```